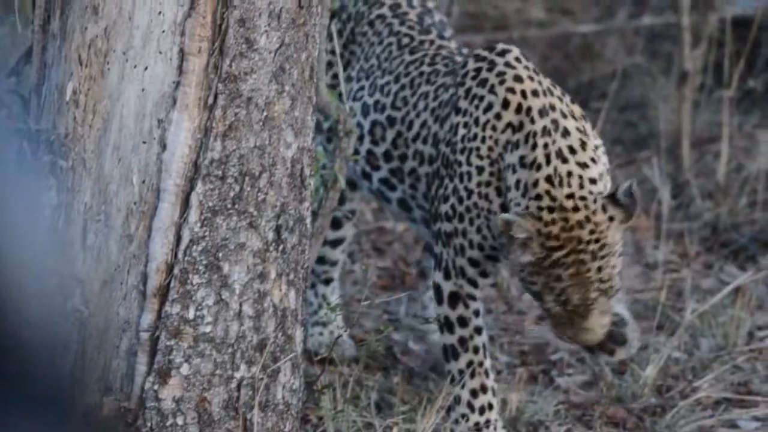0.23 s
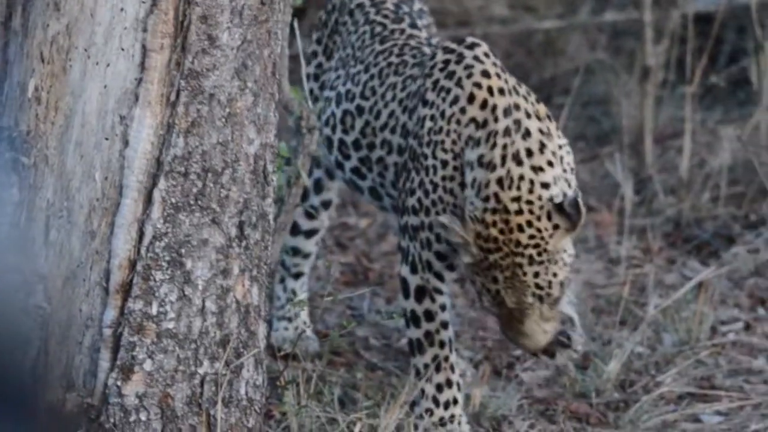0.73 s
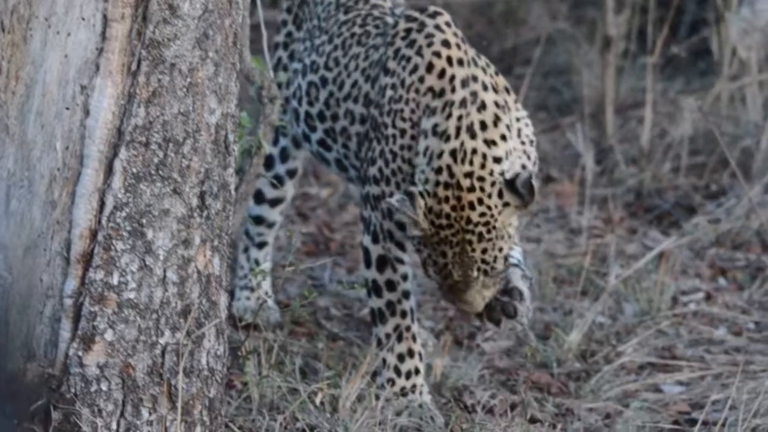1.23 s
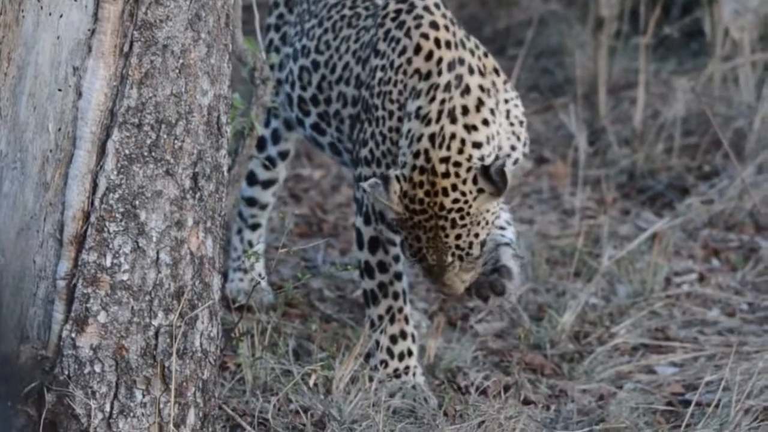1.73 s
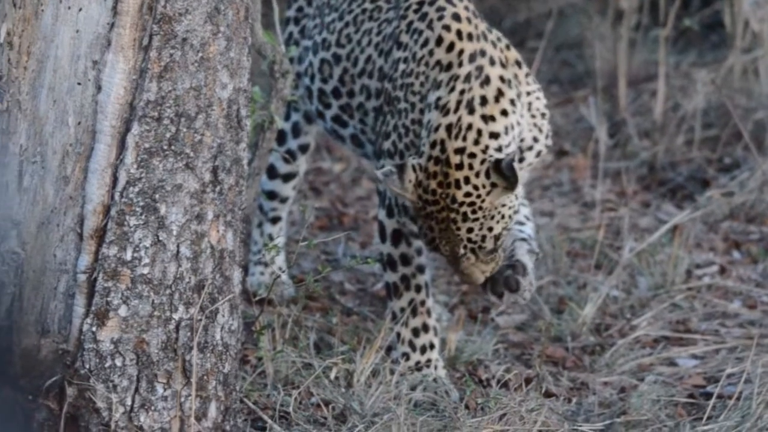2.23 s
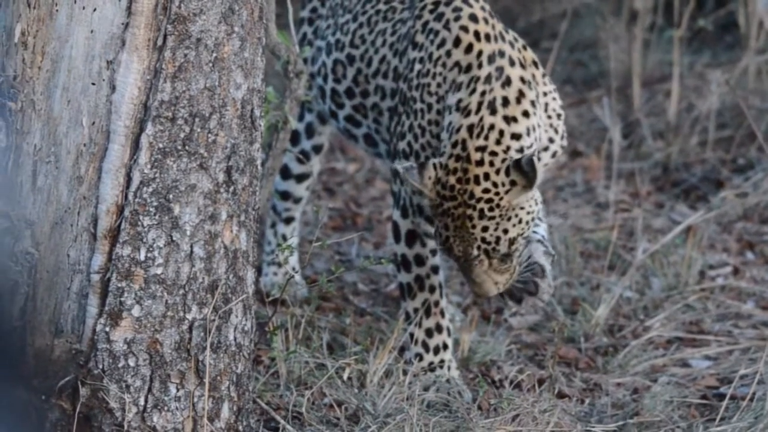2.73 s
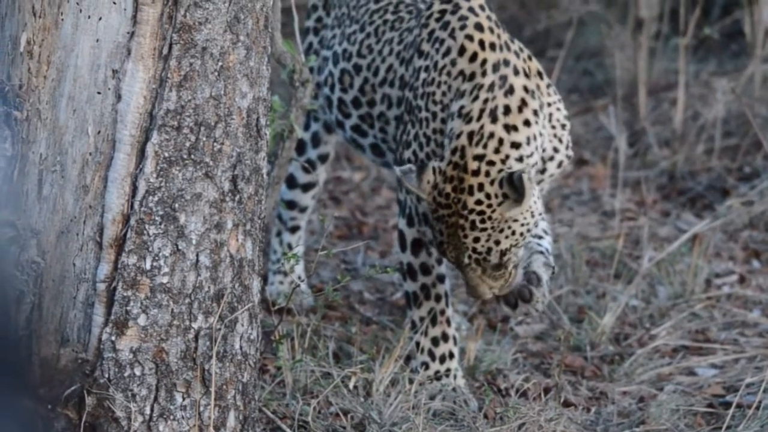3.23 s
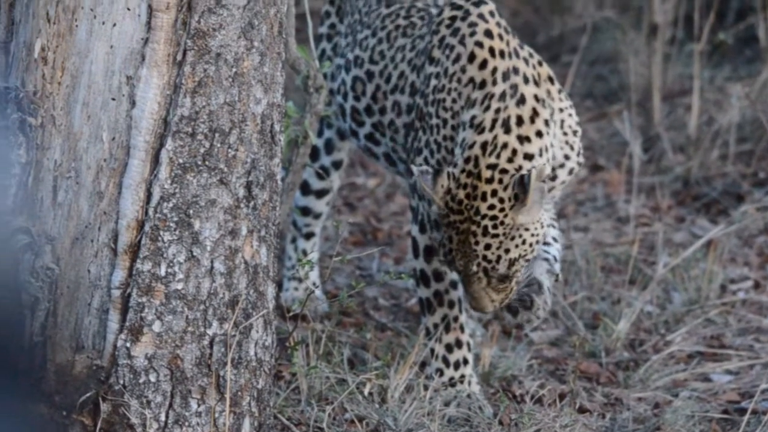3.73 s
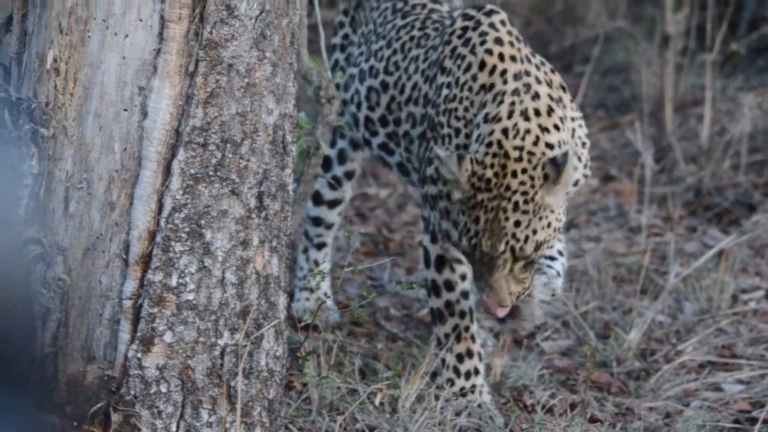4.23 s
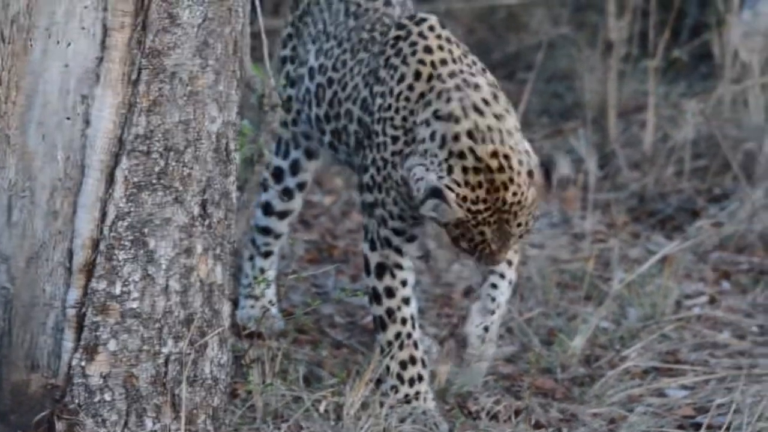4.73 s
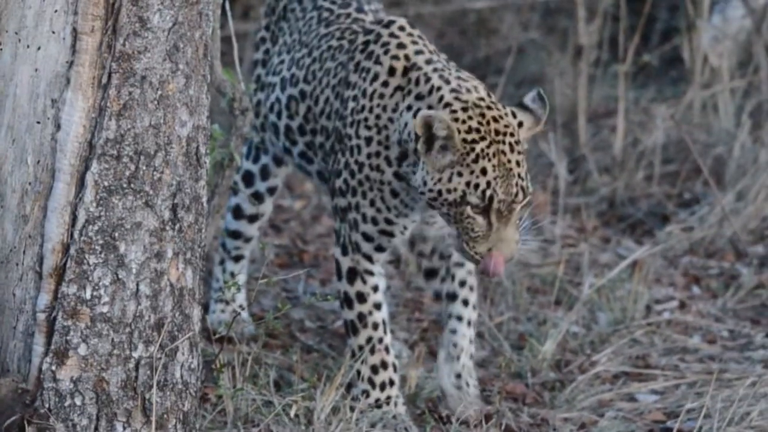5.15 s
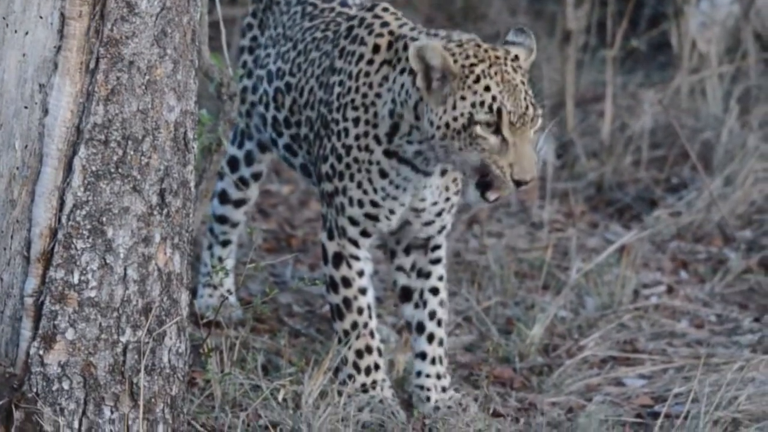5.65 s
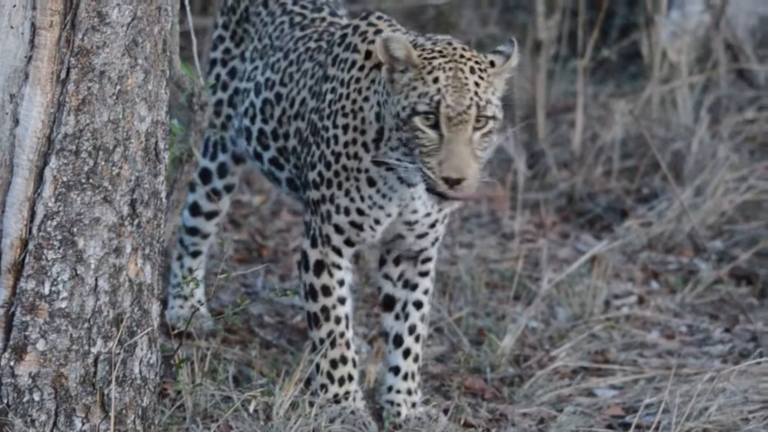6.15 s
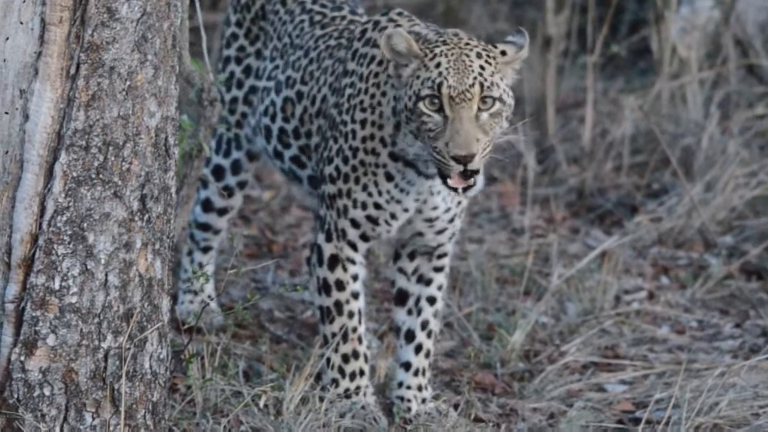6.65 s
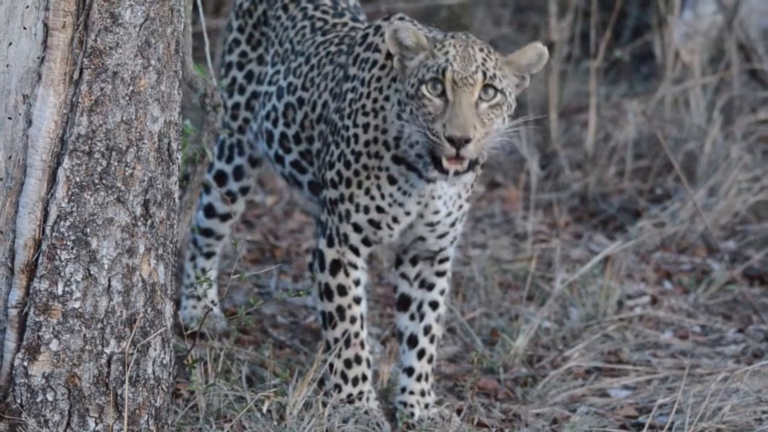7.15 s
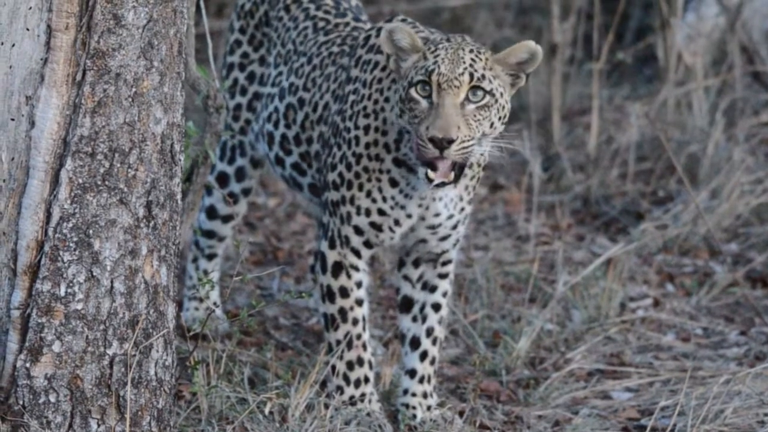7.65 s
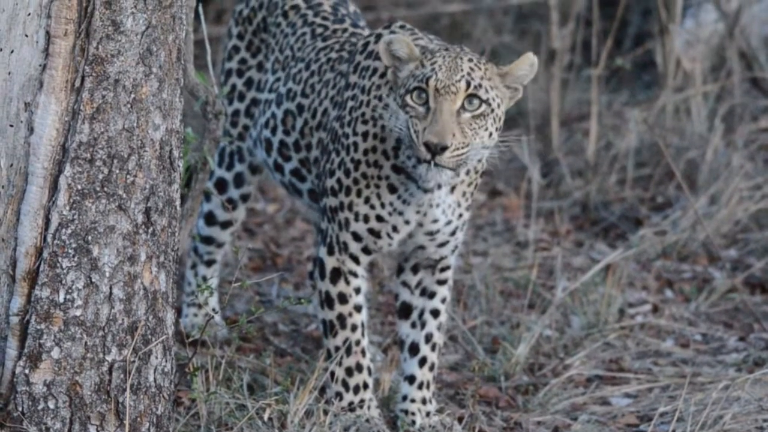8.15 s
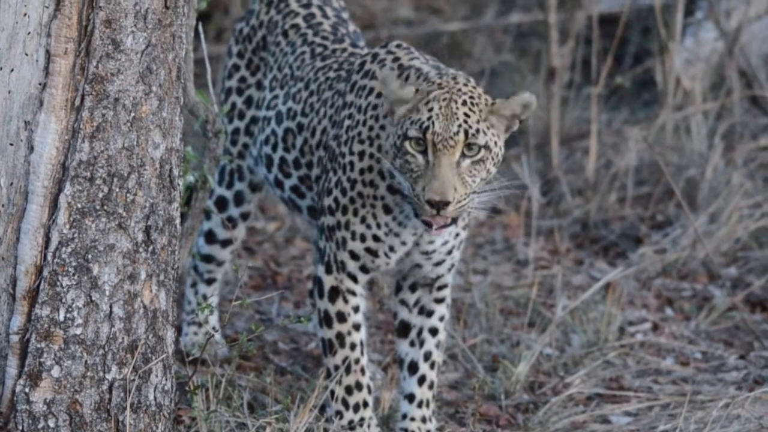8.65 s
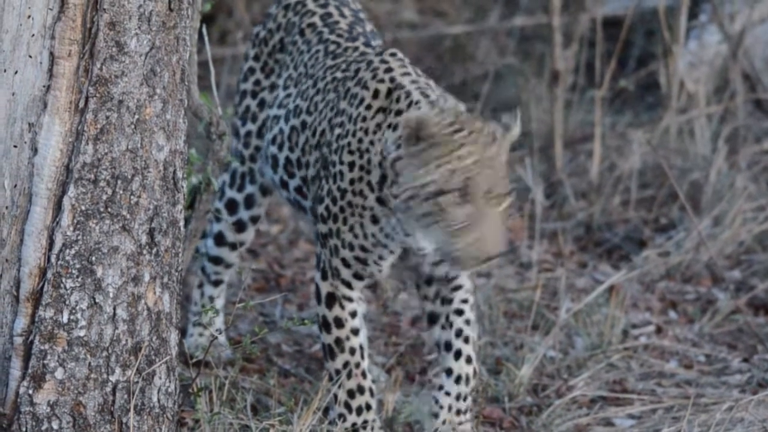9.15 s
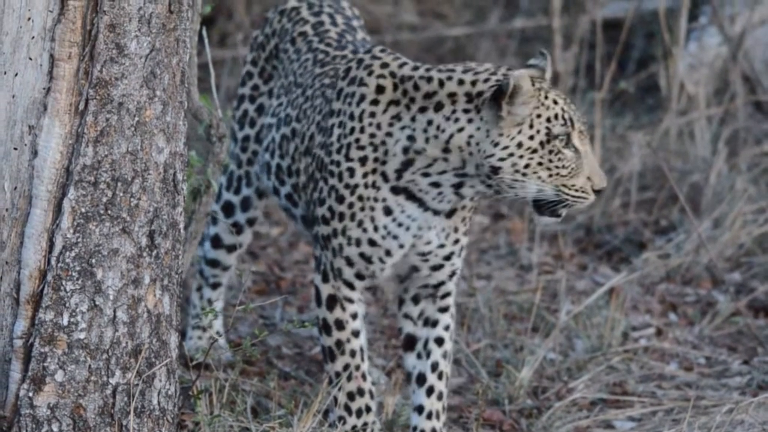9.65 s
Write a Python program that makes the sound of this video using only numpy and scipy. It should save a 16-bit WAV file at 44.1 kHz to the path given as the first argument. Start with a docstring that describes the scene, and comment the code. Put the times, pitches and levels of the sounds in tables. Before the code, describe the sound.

A nearby bird repeats a rasp, falling whistle and pip five times over shrill insect drone, while leaves crackle, twigs snap and soft paws thud.

```python
"""Dry bush, one microphone: insects, as click trains ringing resonances, drone and whine over a wash of noise.
From the start a leopard shifts on the litter: leaves crackle and paws thud (shaped noise), twigs snap (struck wood).
Nearby a bird sings rasp, falling whistle and pip five times, gliding tones breaking into noise; a small bird cuts in.
When it stops, far birds carry on with whistles and chatter over faint twitters, and a paw swishes dry grass."""
import sys
import numpy as np
from scipy import signal
from scipy.fft import rfft, irfft, next_fast_len
from scipy.io import wavfile
from scipy.ndimage import uniform_filter1d

SR = 44100
rng = np.random.default_rng(int(sys.argv[2]) if len(sys.argv) > 2 else 0)


def digitize_waveform(pressure):
    """Quantize a signal to 16-bit integers and store it at the path in sys.argv[1].

    Rows of a 2-D input are taken as channels; values are limited to [-1, 1].
    """
    field = np.atleast_2d(pressure).T
    bounded = np.clip(field, -1, 1)
    quanta = np.round(bounded * 32767).astype(np.int16)
    wavfile.write(sys.argv[1], SR, quanta)


N = 437031
TIME = np.arange(N) / SR
SIZE = next_fast_len(N, real=True)
FREQS = np.maximum(np.arange(SIZE // 2 + 1) * SR / SIZE, 1)


def from_db(db):
    """Decibels to gain."""
    return 10 ** (np.asarray(db) / 20)


def rms_one(x):
    """Scale to unit power."""
    return x / np.sqrt(np.mean(x ** 2) + 1e-20)


def level(rows):
    """Gain through time from (time [s], level [dB]) rows, silent outside them."""
    s, db = np.transpose(rows)
    return from_db(np.interp(TIME, s, db)) * (TIME >= s[0]) * (TIME <= s[-1])


def envelope(t, attack_s, hold_s, fade_s):
    """Swell from t = 0, hold, then fall by 60 dB in fade_s."""
    swell = np.clip(t / attack_s, 0, 1) ** 2
    return swell * from_db(-60 * np.maximum(t - attack_s - hold_s, 0) / fade_s)


def filtered(x, response):
    """Apply a response given at FREQS; unit power."""
    return rms_one(irfft(rfft(x, SIZE) * response, SIZE)[:N])


def coloured(x, colour):
    """Give a steady sound a (frequency [Hz], level [dB]) colour; unit power."""
    hz, db = np.transpose(colour)
    return filtered(x, from_db(np.interp(np.log(FREQS), np.log(hz), db)))


def resonate(x, hz, width):
    """One resonance of the given centre and width [Hz], with gain 1 at its top."""
    r = np.exp(-np.pi * width / SR)
    poles = [1, -2 * r * np.cos(2 * np.pi * hz / SR), r * r]
    return signal.lfilter(np.array([1, 0, -1]) * (1 - r * r) / 2, poles, x + 1e-18)


def drift(rate):
    """Slow chance with spread 1: noise smoothed by two equal low-passes at rate [Hz]."""
    # made at a twentieth of the sample rate, with a run-in thrown away
    r = np.exp(-40 * np.pi * rate / SR)
    noise = rng.standard_normal(N // 20 + 4002)
    slow = signal.lfilter([1], [1, -2 * r, r * r], noise)[4000:]
    return np.interp(np.arange(N) / 20, np.arange(len(slow)), rms_one(slow))


def grains(grain_db, rate):
    """Noise that comes in uneven bursts, its level drifting at rate [Hz]."""
    return rng.standard_normal(N) * from_db(grain_db * drift(rate))


def leaves(x, smear):
    """Foliage round a singer shifts the phase of each pitch by its own chance, smearing the clicks."""
    hz = np.arange(0, SR / 2, 200)
    phase = np.interp(FREQS, hz, smear * rng.standard_normal(len(hz)))
    return filtered(x, np.exp(1j * phase))


def bush(x, t60_s=1.16, build_s=0.043, cut_hz=3700):
    """Trunks and leaves scatter many small, dull echoes that build up, then die away."""
    t = TIME[:2 * SR]
    echoes = rng.standard_normal(len(t)) * (rng.random(len(t)) < .03)
    echoes = echoes * from_db(-60 * t / t60_s) * (1 - np.exp(-t / build_s))
    dull = signal.butter(2, cut_hz, fs=SR, output="sos")
    echoes = signal.sosfilt(dull, echoes / np.linalg.norm(echoes))
    return signal.fftconvolve(x, echoes)[:N]


def glides(notes, wobble):
    """Short notes that slide in pitch, part tone and part rasp of uneven noise."""
    # colour of the rough part: (frequency [Hz], level [dB per Hz])
    rough_colour = [(1000, -41), (1800, -11), (2400, 5), (2900, -3), (3300, -7), (4200, -15), (6000, -8),
                    (11000, -46)]
    harsh = coloured(grains(grain_db=2.5, rate=96), rough_colour)
    unsteady, out = drift(143), np.zeros(N)
    for onset, length, start_hz, end_hz, tone_db, rasp_db in notes:
        span = slice(*np.searchsorted(TIME, [onset, onset + length]))
        u = (TIME[span] - onset) / length
        hz = (start_hz + (end_hz - start_hz) * u) * (1 + wobble * unsteady[span])
        tone = np.sqrt(2) * np.sin(2 * np.pi * np.cumsum(hz) / SR)
        swell = np.tanh(3 * np.sin(np.pi * u))
        out[span] += swell * (from_db(tone_db) * tone + from_db(rasp_db) * harsh[span])
    return out


def background(air_db=4.5, stir_db=1.5, hum_db=-56.5, hum_hz=112.4):
    """A wash of air and stirring litter as unsteady noise, and a far-off hum, a wandering tone that swells once."""
    # air and litter: (time [s], level before air_db is added [dB])
    air_levels = [(0.0, -62), (1.16, -65.5), (2.34, -62), (2.7, -63), (3.34, -59), (4.14, -64),
                  (4.55, -63.5), (6.49, -67.5), (9.91, -69.5)]
    # colour of the air: (frequency [Hz], level [dB])
    air_colour = [(20, -15), (45, -9), (80, -3), (150, -1), (400, 0.5), (800, -1.5), (1500, -4), (2300, -2),
                  (3200, -10), (4000, -13), (5000, -8.5), (5700, -14.5), (9000, -18.5), (14000, -41)]
    air_gain = from_db(air_db + np.interp(TIME, *np.transpose(air_levels)))
    air = air_gain * coloured(grains(grain_db=stir_db, rate=13), air_colour)
    hum = np.sqrt(2) * np.sin(2 * np.pi * np.cumsum(hum_hz * (1 + 0.0303 * drift(15))) / SR)
    hum_swell = envelope(TIME - 2.92, attack_s=0.3, hold_s=0, fade_s=0.48)
    return air + from_db(hum_db) * hum_swell * hum


def whines(swell_db=5.0, quaver_hz=6.0):
    """Smaller insects sing a nearly pure note that quavers and comes and goes."""
    # thin notes over the chorus: (pitch [Hz], quaver [share of pitch], peak level before the swell [dB])
    whine_notes = [(10750, .008, -58), (11430, .008, -60.5), (12520, .004, -72)]
    out = np.zeros(N)
    for hz, quaver, db in whine_notes:
        sway = np.sin(2 * np.pi * np.cumsum(quaver_hz * (1 + .3 * drift(3))) / SR) + .6 * drift(30)
        tone = np.sin(2 * np.pi * np.cumsum(hz * (1 + quaver * sway)) / SR)
        out += from_db(db + swell_db * np.tanh(drift(2.5))) * tone
    return out


def insect(rate, waver, jitter_s, sway_hz=5.5, sway_width=3.0):
    """One insect's train of clicks; its rate sways about five times a second."""
    sway = filtered(rng.standard_normal(N), np.exp(-((FREQS - sway_hz) / sway_width) ** 2))
    cycles = np.cumsum(rate * (1 + waver * sway)) / SR
    at = np.interp(np.arange(1, int(cycles[-1])), cycles, np.arange(N))
    chance = rng.standard_normal((N // 20, 2))[:len(at)]
    at = np.clip(at + jitter_s * SR * chance[:, 0], 4, N - 6)
    size, whole = from_db(1.4 * chance[:, 1]), at.astype(int)
    # each click falls between samples, so a short sinc spreads it over eight
    return rms_one(sum(np.bincount(whole + k, size * np.sinc(k - at % 1), N) for k in range(-3, 5)))


def drone(far_db=-9, flutter_db=0.84, swell_db=2.0, chorus_db=0.2, lull_s=0.046):
    """Near click trains, each swelling in its own time, and noise for the many far ones ring shared resonances."""
    # nearest insects: (click rate [per s], waver [share of rate], level before scaling and swell [dB])
    near_insects = [(318.3, .003, -9), (318.6, .011, -4), (318.9, .006, -10), (430, .007, -11),
                    (276, .008, -13), (369, .008, -13)]
    # sound-organ resonances: (centre [Hz], width scale [Hz], level [dB])
    organ_modes = [(6300, 630, -25.5), (6850, 370, -24.5), (7170, 253, -14.5), (7540, 234, -12),
                   (7762, 160, -7), (7980, 130, -7), (8440, 360, -9.5), (8436, 246, -4.5), (8620, 140, -8),
                   (9140, 850, 0), (9475, 240, 0), (9920, 204, -2), (10305, 155, -2.5), (10694, 266, -6.5),
                   (11280, 130, -12), (11520, 290, -15.5), (12000, 500, -24), (12400, 350, -34),
                   (13100, 1200, -41)]
    # slow chorus level: (time [s], level before chorus_db, lulls and flutter [dB])
    chorus_levels = [(0.0, -36.5), (0.47, -36), (1.43, -36), (1.87, -37), (3.89, -36), (4.06, -37),
                     (9.69, -37), (9.91, -34.5)]
    # brief lulls, as when a few insects pause: (time [s], depth [dB])
    lulls = [(.96, 0.5), (2.419, 3), (4.191, 2.5), (4.85, 4), (5.33, 1.5), (5.52, 2), (9.58, 0.5)]
    clicks = 0
    for rate, waver, db in near_insects:
        swell = from_db(db + swell_db * drift(2.6))
        clicks = clicks + swell * leaves(insect(rate, waver, jitter_s=4e-6), smear=1.65)
    clicks = rms_one(clicks) + from_db(far_db) * rng.standard_normal(N)
    power = 0
    for hz, width, db in organ_modes:
        power = power + from_db(db) ** 2 / (1 + ((FREQS - hz) / width * 1.09) ** 2) ** 3
    buzz = filtered(clicks, np.sqrt(power))
    buzz /= np.sqrt(uniform_filter1d(buzz ** 2, size=SR // 10))  # together they hold an even level
    lull_db = sum(db * np.exp(-((TIME - s) / lull_s) ** 2) for s, db in lulls)
    slow_db = chorus_db + np.interp(TIME, *np.transpose(chorus_levels))
    return buzz * from_db(slow_db - lull_db + flutter_db * drift(6.3))


def far_birds(echo_db=-8, twitter_db=-71, twitters_per_s=12, whistle_rasp_db=-15, chatter_rasp_db=0,
              chatter_sag_hz=60):
    """Gliding whistles, rough chatter and a scatter of quick falling twitters, blurred by distance with echoes."""
    # short whistles: (time [s], length [s], start pitch [Hz], end pitch [Hz], tone level [dB])
    far_whistles = [(4.07, .12, 1850, 1870, -66), (4.91, 0.22, 2770, 2770, -64),
                    (5.49, 0.14, 2530, 2450, -61), (6.288, 0.16, 2510, 2440, -62),
                    (7.06, .1, 2660, 2270, -58.5), (7.14, .04, 2290, 1800, -63),
                    (7.39, .049, 2500, 2340, -64.5), (7.71, .047, 2560, 2350, -63.5),
                    (8.46, .05, 2510, 2450, -63), (8.67, .085, 2470, 2450, -64),
                    (9.068, 0.034, 4080, 4040, -63), (9.07, 0.037, 2500, 2290, -57.5),
                    (9.08, .13, 3570, 3550, -71), (9.128, .04, 4080, 4060, -63),
                    (9.692, 0.048, 2520, 2400, -61), (9.746, 0.11, 2510, 2330, -57)]
    # bursts of rough chatter: (time [s], length [s], start pitch [Hz], tone level [dB])
    far_chatter = [(7.87, .11, 2480, -64), (8.104, 0.065, 2600, -69), (8.31, 0.096, 2300, -67),
                   (8.478, 0.148, 3010, -62), (9.102, .14, 2900, -62.5), (9.786, .18, 3030, -60.5)]
    twitters = []
    for when, length, high, loud in rng.random((400, 4))[:int(twitters_per_s * N / SR)]:
        start_hz, end_hz = 2100 + 900 * high, 1750 + 800 * high
        tone_db = twitter_db + 4 * (loud - .5)
        twitters.append((when * N / SR, 0.02546 + 0.0367 * length, start_hz, end_hz, tone_db, twitter_db - 13))
    whistles = [(*whistle, whistle[-1] + whistle_rasp_db) for whistle in far_whistles]
    chatter = [(s, length, hz, hz - chatter_sag_hz, db, db + chatter_rasp_db)
               for s, length, hz, db in far_chatter]
    calls = glides(twitters, wobble=.03)
    calls += glides(whistles, wobble=0.0095)
    calls += glides(chatter, wobble=.024)
    return calls + from_db(echo_db) * bush(calls)


def litter():
    """Dry leaves give way under the animal in brief, dull crackles of grainy noise."""
    # stirring leaves: (time [s], length [s], peak level [dB])
    rustles = [(0.023, 0.24, -50), (0.722, 0.069, -62), (1.508, 0.059, -63), (2.292, 0.049, -62),
               (2.983, 0.068, -59), (3.377, 0.055, -66), (5.385, 0.17, -62)]
    # colour of the leaves: (frequency [Hz], level [dB])
    rustle_colour = [(120, -56), (280, 3), (480, -2), (850, 10.5), (1200, 7.5), (2500, -29), (8000, -35)]
    push = sum(level([(s, db - 6), (s + length / 3, db), (s + length, db - 6)]) for s, length, db in rustles)
    return push * coloured(grains(grain_db=3.5, rate=200), rustle_colour)


def paws(rise_s=0.002, echo_db=-18, ring_db=-2, tread_db=-4, swish_db=-37.5):
    """Padded feet thud, noise ringing soft ground at a dull pitch; one sweeps dry grass, a swell of grainy noise."""
    # footfalls and shifts of weight: (time [s], level before the ground mix [dB], 30 dB decay [s], pitch [Hz])
    footfalls = [(.53, -62, 0.22, 129), (1.94, -60, 0.13, 252), (1.54, -61, 0.13, 270),
                 (2.33, -61, 0.11, 275), (2.99, -56, 0.17, 150), (3.4, -56.5, .25, 280),
                 (3.68, -58, .12, 280), (4.03, -62, .2, 110), (4.389, -54, 0.11, 250),
                 (4.682, -46, .08, 135), (4.84, -56, 0.089, 140), (5.07, -58, 0.07, 100),
                 (5.415, -58, .12, 220), (5.76, -55, 0.081, 203)]
    # colour of the tread: (frequency [Hz], level [dB])
    thud_colour = [(30, -36), (70, 5.5), (130, 4.5), (250, -3.5), (500, -3.5), (1200, -22), (3000, -37)]
    # colour of the grass: (frequency [Hz], level [dB])
    swish_colour = [(300, -16), (1000, -19), (1400, -4.5), (2500, -0.5), (3300, -2), (4700, -0.5),
                    (5700, -11), (7000, -4), (14000, -30)]
    tread = coloured(rng.standard_normal(N), thud_colour)
    thuds, t = np.zeros(N), TIME[:SR // 2]
    for s, db, decay_s, hz in footfalls:
        span = slice(round(s * SR), round(s * SR) + len(t))
        ring = rms_one(resonate(tread[span], hz, 0.21 * hz))
        ground = from_db(tread_db) * tread[span] + from_db(ring_db) * ring
        thuds[span] += from_db(db - 30 * t / decay_s) * (1 - np.exp(-t / rise_s)) * ground
    sweep = from_db(swish_db) * envelope(TIME - 4.666, attack_s=0.035, hold_s=0.042, fade_s=0.36)
    swish = sweep * coloured(grains(grain_db=2.0, rate=370), swish_colour)
    return thuds + swish + from_db(echo_db) * bush(swish)


def twigs(splinter=0.45, echo_db=-22):
    """A sharp break and a spray of tearing fibres ring the wood; thin twigs sound higher."""
    # breaks: (time [s], peak level before echoes [dB], pitch [Hz], 60 dB fade of the tearing [s])
    snaps = [(0.175, -22, 7000, 0.0068), (1.932, -8, 5000, 0.0048), (1.9318, -22, 1020, 0.021),
             (1.939, -35.5, 600, 0.068), (3.1914, -17, 2640, 0.012), (3.379, -36, 6000, 0.0076),
             (3.681, -34, 580, 0.017), (7.167, -42, 1080, 0.0086), (7.167, -44, 3300, 0.01)]
    # resonances of dry wood: (centre [Hz], width [Hz], level relative to one another [dB])
    wood_modes = [(510, 570, 0), (1040, 1000, -1), (2080, 180, 6.5), (2900, 170, 1.5), (4120, 1270, -0.5),
                  (5650, 220, 2), (6040, 540, -3), (7600, 880, -5), (11200, 1700, -16)]
    out, t = np.zeros(N), TIME[:SR // 10]
    for s, peak_db, hz, tear_s in snaps:
        force = (t == 0) + splinter * rng.standard_normal(len(t)) * from_db(-60 * t / tear_s)
        wood = 0
        for k, (mode_hz, width, db) in enumerate(wood_modes):
            wood = wood + (-1) ** k * from_db(db) * resonate(force, mode_hz, width)
        crack = resonate(force, hz, .5 * hz) + 0.067 * wood
        at = round(s * SR)
        out[at:at + len(t)] += from_db(peak_db) * crack / np.abs(crack).max()
    return out + from_db(echo_db) * bush(out)


def small_bird():
    """A small bird cuts in once with three quick gliding notes."""
    # notes: (time [s], length [s], start pitch [Hz], end pitch [Hz], tone level [dB], rasp level [dB])
    chirp_notes = [(2.885, .025, 5740, 6450, -56, -80), (2.905, 0.023, 6500, 6700, -49, -80),
                   (2.933, 0.037, 5250, 5030, -42.5, -70)]
    return glides(chirp_notes, wobble=0.005)


def harshness(squeal_hz=3100, swing=.25):
    """A voice in chaos: uneven puffs, and a squeal whose pitch leaps about every few milliseconds."""
    # colour of the rasp: (frequency [Hz], level [dB per Hz])
    rasp_colour = [(300, -45), (650, -19.5), (900, -8), (1150, -2), (1600, -1.5), (2000, 0.5), (2280, 8.5),
                   (2650, -0.5), (3400, -1), (4200, -2.5), (4850, -2), (5600, -11), (6200, -4), (7500, -29),
                   (10000, -48)]
    puffs = rms_one(grains(grain_db=4.0, rate=200))
    squeal = np.sin(2 * np.pi * np.cumsum(squeal_hz * (1 + swing * drift(220))) / SR)
    return coloured(leaves(puffs + .4 * squeal, smear=2.0), rasp_colour)


def rasp_shape(t, start_hz=2330, sag_hz_per_s=450, rattle_hz=73.2, rattle_depth=0.19):
    """Pitch, tone and rasp of the harsh syllable: a few rattling pushes on one sagging note."""
    # rough start, yelp, long scrape, weak push: (time after onset [s], attack [s], hold [s], 60 dB fade [s],
    # tone level before the rattle [dB], rasp level before the rattle [dB])
    pushes = [(-.004, 0.0095, 0.0048, 0.045, -38.5, -42), (.008, 0.014, .016, 0.058, -33.5, -42.5),
              (0.035, 0.026, 0.1, 0.21, -42.5, -39), (0.2, .03, 0.026, 0.23, -52, -46.5)]
    tone, rasp = 0, 0
    for start, attack_s, hold_s, fade_s, tone_db, rasp_db in pushes:
        push = envelope(t - start, attack_s, hold_s, fade_s)
        tone = tone + from_db(tone_db) * push
        rasp = rasp + from_db(rasp_db) * push
    rattle = 1 + rattle_depth * np.cos(2 * np.pi * rattle_hz * t)
    return start_hz - sag_hz_per_s * t, tone * rattle, rasp * rattle


def whistle_shape(t, tone_db=-28.5, droop_db_per_s=45, opening_db=-43, closing_db=-51, dip_s=0.0075):
    """Pitch, tone and rasp of the falling whistle: clean in the middle, rough as it starts and as it dies."""
    # echoes off the ground thin the whistle twice on the way down: (time after onset [s], depth [dB])
    echo_dips = [(.053, 13), (.115, 11)]
    hz = 2470 + 337 * np.exp(-t / .022) - 1200 * t  # drops quickly onto its note, then sags
    dip_db = sum(db * np.exp(-((t - s) / dip_s) ** 2) for s, db in echo_dips)
    droop_db = droop_db_per_s * np.maximum(t - .065, 0)
    tone = from_db(tone_db - dip_db - droop_db) * envelope(t, attack_s=0.049, hold_s=.07, fade_s=0.14)
    rasp = from_db(opening_db) * envelope(t, attack_s=0.014, hold_s=0.0094, fade_s=0.11)
    rasp += from_db(closing_db) * envelope(t - .115, attack_s=0.016, hold_s=0.056, fade_s=0.12)
    return hz, tone, rasp


def pip_shape(t, tone_db=-32.5, opening_db=-45, closing_db=-41.5):
    """Pitch, tone and rasp of the short level pip, which also opens and closes roughly."""
    hz = 2076 - 110 * np.exp(-t / 0.0109)  # hooks up onto its note
    tone = from_db(tone_db) * envelope(t, attack_s=0.02, hold_s=0.019, fade_s=0.071)
    rasp = from_db(opening_db) * envelope(t, attack_s=0.0089, hold_s=0.0033, fade_s=0.084)
    rasp += from_db(closing_db) * envelope(t - .028, attack_s=0.014, hold_s=.008, fade_s=0.26)
    return hz, tone, rasp


def syllable(shape, onsets, harsh, overtones_db, wobble, quaver=0.0063, length_s=.4):
    """A whistled tone with overtones that breaks into a harsh rasp; each repeat differs a little."""
    unsteady, sway, out = drift(254), drift(54), np.zeros(N)
    for onset in onsets:
        span = slice(*np.searchsorted(TIME, [onset, onset + length_s]))
        hz, tone, rasp = shape(TIME[span] - onset)
        # the harsher the voice, the less it holds its pitch
        roughness = rasp / (rasp + tone + 1e-12)
        pitch = hz * (1 + quaver * sway[span] + wobble * roughness * unsteady[span])
        phase = 2 * np.pi * np.cumsum(pitch) / SR
        # overtones keep nearly the same share of the tone, loud or soft
        share = (tone / tone.max()) ** 0.034
        overtones = sum(from_db(db) * np.sin(k * phase) for k, db in enumerate(overtones_db, 2))
        voice = np.sin(phase) + share * overtones
        out[span] += np.sqrt(2) * tone * voice + rasp * harsh[span]
    return out


def near_bird(echo_db=-10.0, pip_echo_db=-13, catch_db=-46, catch_rasp_db=-52):
    """Rasp, whistle and pip in turn, a voiced tone breaking into chaos, with echoes off the bush."""
    # syllable onsets, one row a phrase: (rasp time [s], whistle time [s], pip time [s])
    phrases = [(.032, .42, .598), (.79, 1.18, 1.355), (1.538, 1.948, 2.128), (2.315, 2.696, 2.92),
               (3.123, 3.509, 3.745)]
    harsh = harshness()
    rasps_at, whistles_at, pips_at = np.transpose(phrases)
    song = syllable(rasp_shape, rasps_at, harsh, overtones_db=[-8, -19], wobble=0.0682, quaver=0.0109)
    song += syllable(whistle_shape, whistles_at, harsh, overtones_db=[-12, -26], wobble=0.062)
    pips = syllable(pip_shape, pips_at, harsh, overtones_db=[-6, -17], wobble=0.041)
    # the voice catches in a high, unsteady squeak as each whistle starts
    catches = [(s + .004, .032, 2850, 3250, catch_db, catch_rasp_db) for s in whistles_at]
    song += glides(catches, wobble=0.059)
    return song + pips + bush(from_db(echo_db) * song + from_db(pip_echo_db) * pips)


def scene():
    """Everything reaches one microphone."""
    birds = near_bird() + small_bird() + far_birds()
    animal = twigs() + paws() + litter()
    return (drone() + whines() + birds + animal + background())[None]


def record(dry, dip_depth=1.0, cutoff_hz=14500):
    """The microphone has a narrow dip in its treble; the top is cut steeply."""
    # the dip: (centre [Hz], width [Hz])
    mic_dip = (5700, 280)
    heard = dry - dip_depth * resonate(dry, *mic_dip)
    return signal.sosfilt(signal.ellip(10, .1, 80, cutoff_hz, fs=SR, output="sos"), heard)


dry = scene()
out = record(dry)
digitize_waveform(out)
```